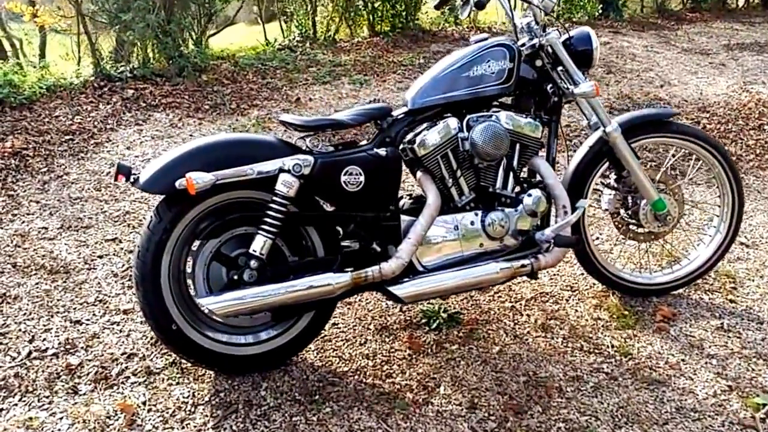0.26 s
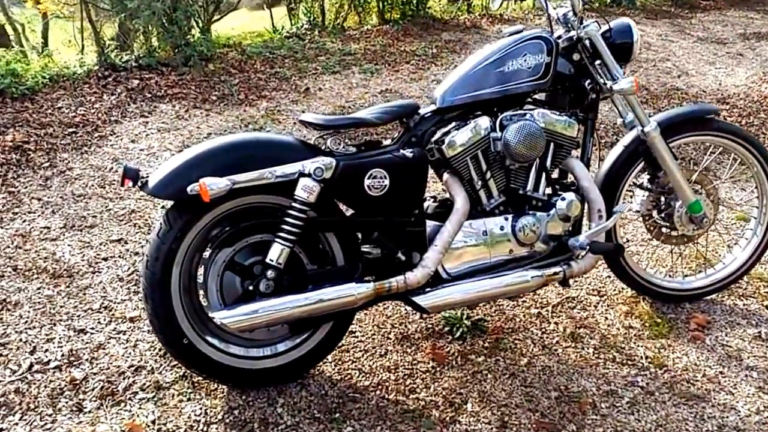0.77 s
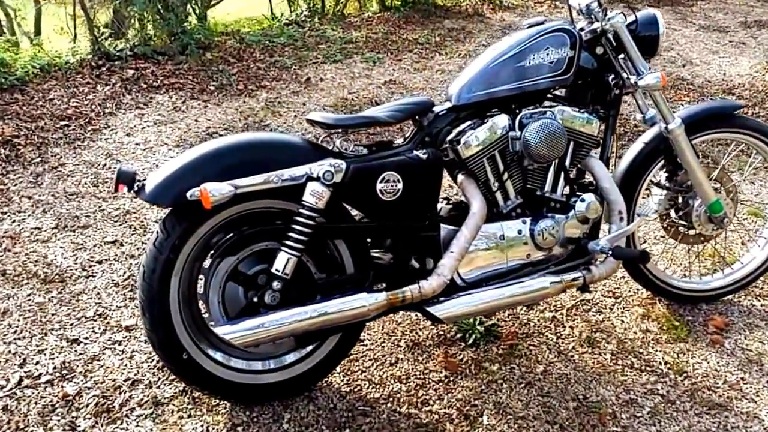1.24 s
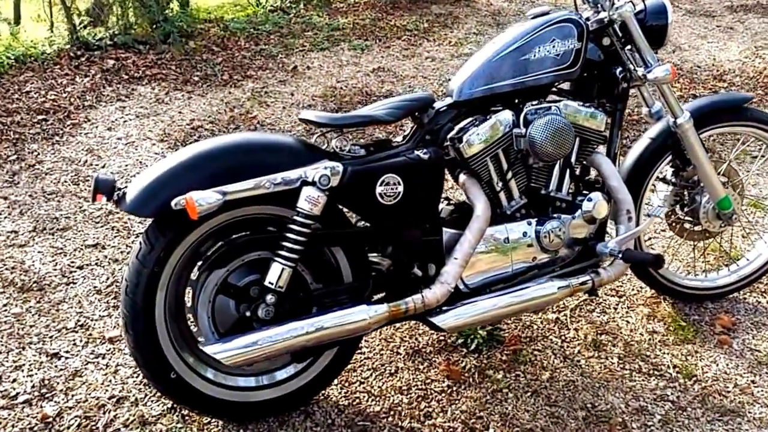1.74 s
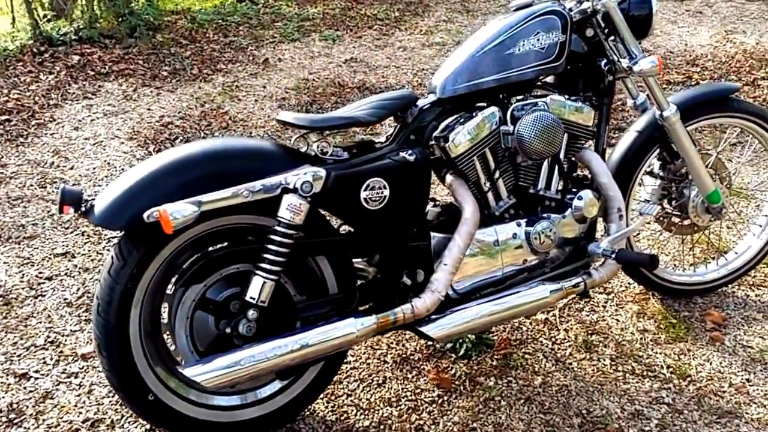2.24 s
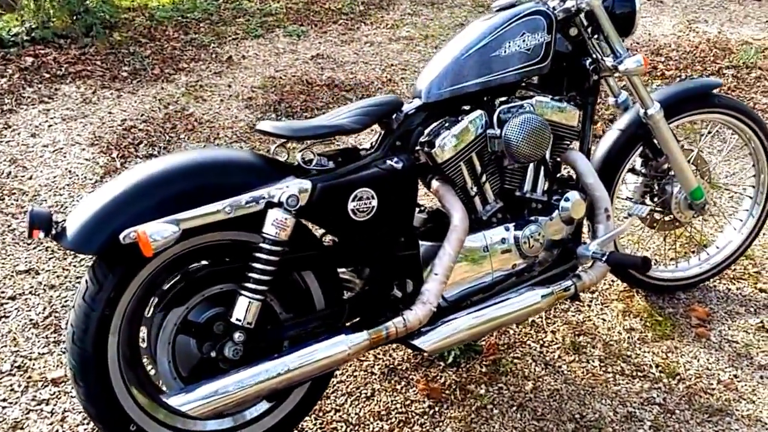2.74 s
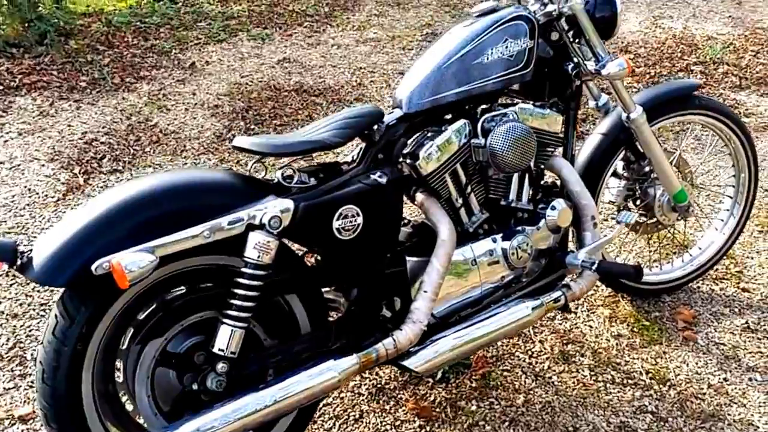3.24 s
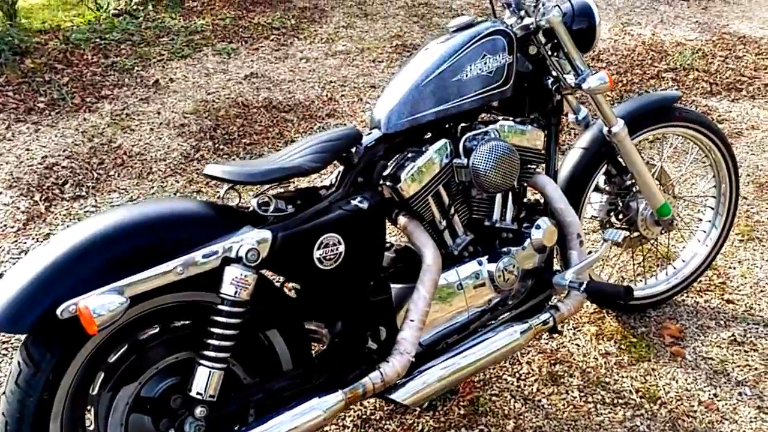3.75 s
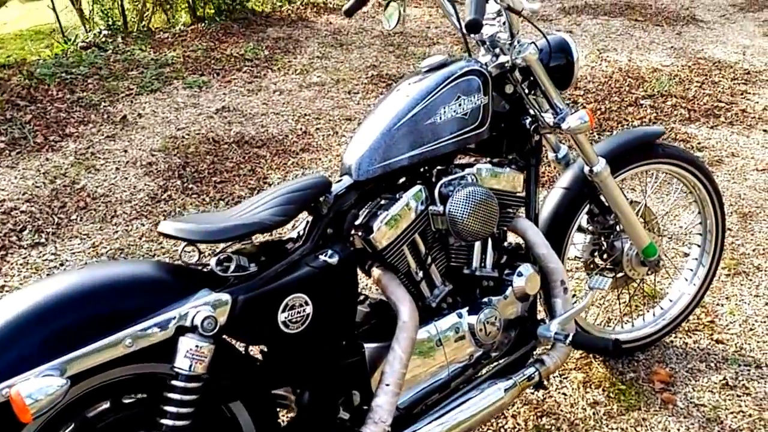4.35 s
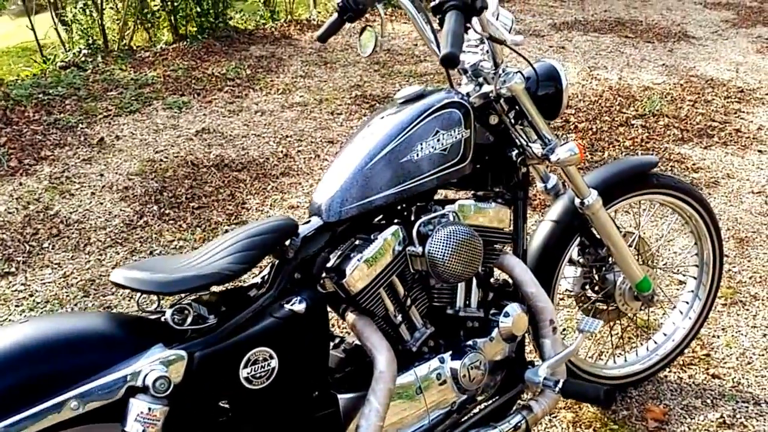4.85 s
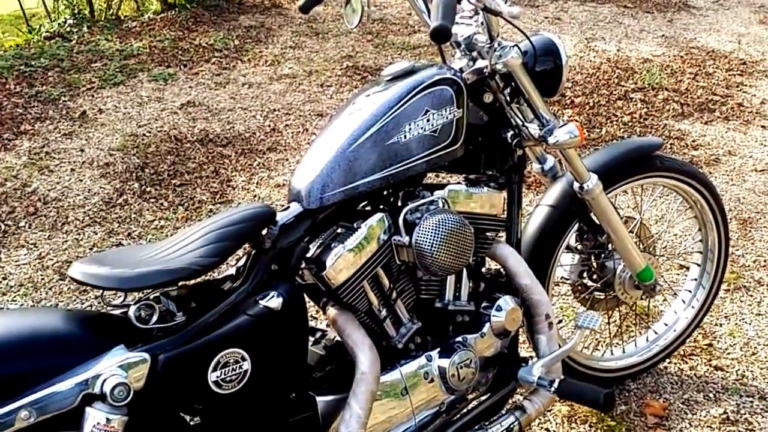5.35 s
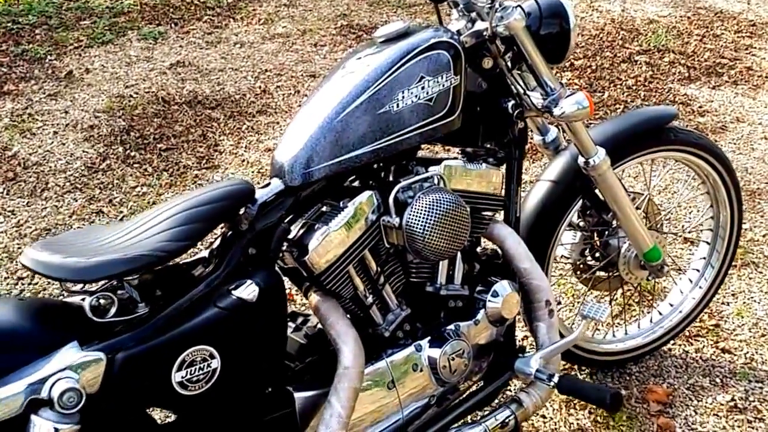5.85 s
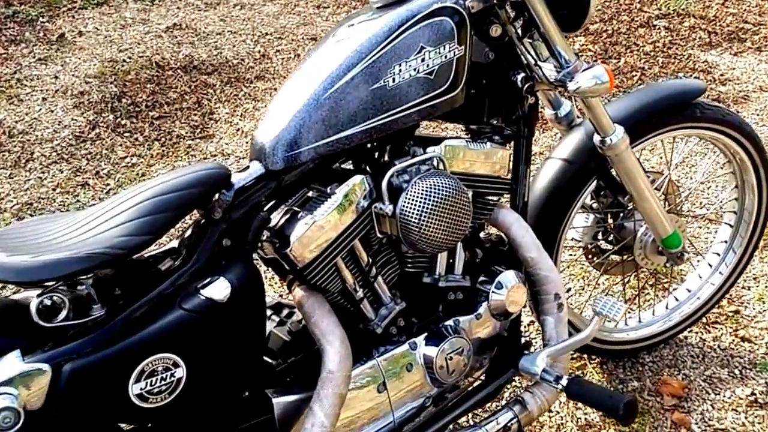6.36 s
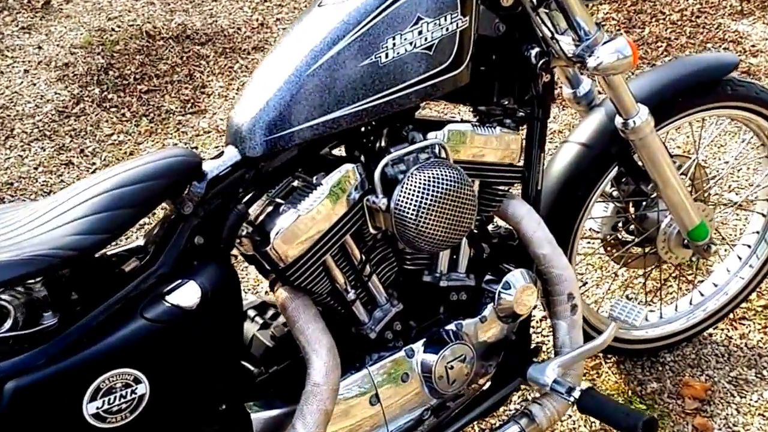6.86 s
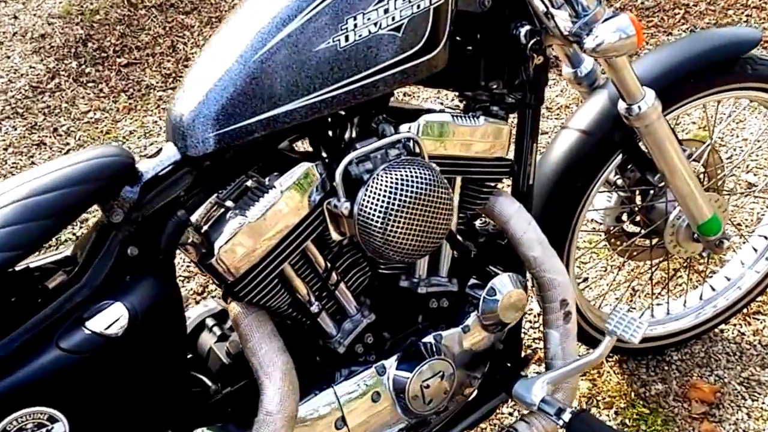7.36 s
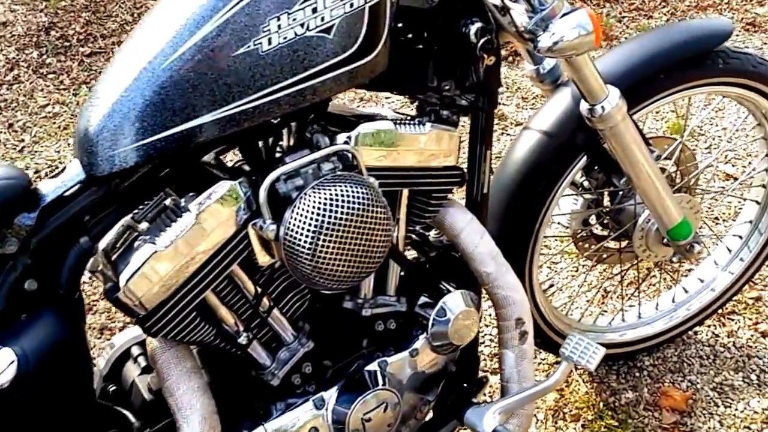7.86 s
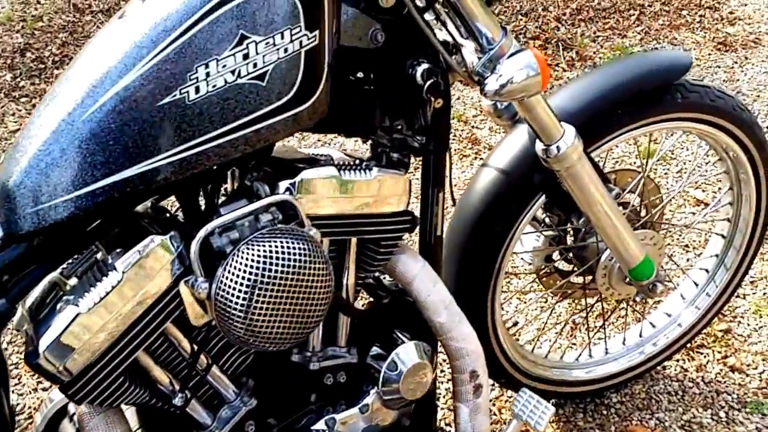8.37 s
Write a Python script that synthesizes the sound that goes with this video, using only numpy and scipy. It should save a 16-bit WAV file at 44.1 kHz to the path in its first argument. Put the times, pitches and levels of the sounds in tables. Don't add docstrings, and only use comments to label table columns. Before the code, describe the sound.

A large twin-cylinder motorcycle idles unevenly in an open gravel yard. Deep exhaust thumps come in irregular singles and close pairs, each with a short spit of hissing gas. Intake gulps and valve ticks fall between them. Over about eight seconds the handheld stereo microphone moves closer; tappet and gear clatter grows until it crowds the exhaust, and strong thumps distort, especially on the right.

```python
import sys
import numpy as np
from scipy import signal
from scipy.fft import rfft, irfft, next_fast_len
from scipy.io import wavfile
from scipy.ndimage import uniform_filter1d, map_coordinates

SR = 44100
rng = np.random.default_rng(int(sys.argv[2]) if len(sys.argv) > 2 else 0)


def to_wav(s):
    ch = np.atleast_2d(s).T
    pcm = np.round(np.clip(ch, -1, 1) * 32767)
    wavfile.write(sys.argv[1], SR, pcm.astype(np.int16))


def makeup_ratio(level_db):
    decades = np.asarray(level_db, float) / 20
    return 10 ** decades


N = 379701
CYCLE_S = .157
AGE = np.arange(SR // 3) / SR

# (frequency [Hz], level [dB per Hz])
GAS_BREATH = [(250, 16), (400, 6.5), (700, 10), (1000, 3.5), (1400, -4.5), (2700, -2.5), (4500, -10),
              (9000, -12), (14000, -34.5)]
# (frequency [Hz], level [dB per Hz])
FAR_WHIRR = [(2500, -41), (4000, -21), (5200, -24), (6700, -4), (8500, -3), (11000, -5.5), (14300, -13.5)]
NEAR_WHIRR = [(2500, -31), (4000, -51), (5000, 4), (5700, 6.5), (6600, -9), (7700, 14), (8600, 0.5),
              (10200, 6), (12500, 1), (14300, 3)]


def unit(x):
    return x / np.sqrt(np.mean(x ** 2) + 1e-20)


def along(points, hz):
    f, v = np.transpose(points)
    return np.interp(np.log(hz + 1), np.log(f + 1), v)


def wobble(rate):
    return map_coordinates(rng.standard_normal(int(N * rate / SR) + 4), [np.arange(N) * rate / SR])


def filtered(x, response):
    m = next_fast_len(N + SR // 2)
    return irfft(rfft(x, m) * response(np.fft.rfftfreq(m, 1 / SR)), m)[..., :N]


def colour(spectrum):
    return lambda hz: makeup_ratio(along(spectrum, hz))


def peak(centre_hz, width_hz):
    return lambda hz: 1 / (1 + (2 * (hz - centre_hz) / width_hz) ** 2)


def rush(gain, patchy_db=0):
    # (frequency [Hz], likeness [-1 to 1])
    alike = [(100, .98), (300, .9), (640, .8), (1300, .7), (1800, .2), (2250, -.85), (2900, -.3),
             (4200, .1), (4800, -.2), (5300, -.8), (5900, -.1), (7000, 0)]
    z = signal.stft(rng.standard_normal((2, N)), nperseg=256)[2]
    field = uniform_filter1d(rng.standard_normal(z.shape[1:]), size=3, axis=0)
    field = uniform_filter1d(field, size=7, axis=1)
    pair = signal.istft(z * makeup_ratio(patchy_db * unit(field)), nperseg=256)[1][:, :N]

    def mid_side_gain(hz):
        angle = np.arccos(np.clip(along(alike, hz), -1, 1)) / 2
        return gain(hz) * np.array([np.cos(angle), np.sin(angle)])

    mid, side = filtered(pair, mid_side_gain)
    return np.array([mid + side, mid - side]) / np.std(mid - side)


def played(times, gains, shape):
    lead = SR // 10
    train = np.bincount(np.round(times * SR).astype(int) + lead, gains, N + SR)
    return signal.fftconvolve(train, shape)[lead:lead + N]


def puff(delay_s, rise_s):
    u = np.maximum(AGE - delay_s, 0) / rise_s
    return u * np.exp(1 - u)


def ring(modes, push):
    free = sum(swing * makeup_ratio(-60 * AGE / t60) * np.cos(2 * np.pi * hz * AGE) for hz, t60, swing in modes)
    return signal.fftconvolve(free, push / push.sum())[:len(AGE)]


def strokes():
    # (time [s], thump [dB], jet hiss [dB])
    front_leads = [(0.292, -6, -17.5), (0.7481, -5, -20.5), (1.235, -2.5, -15), (1.7074, -1, -12),
                   (2.178, -6.5, -33), (2.6397, 1.1, -12), (3.0847, 0, -20), (3.5538, -1.5, -13.5),
                   (4.0148, -5, -18.5), (4.4952, 2, -10.5), (4.962, -3.5, -23), (5.4519, 1.5, -9),
                   (5.9185, 0, -15), (6.3859, 0, -13.5), (6.848, 1.7, -16.5), (7.474, -7, -42),
                   (7.9837, 3.5, -18.5), (8.437, 0.5, -33)]
    # (time [s], thump [dB], jet hiss [dB])
    front_alone = [(-0.0085, -5, -37), (0.5933, -3.5, -11.5), (0.902, -2, -13), (1.065, -3.5, -15.5),
                   (1.3849, 0, -16.5), (1.54, -2.4, -16.5), (2.0235, -0.5, -12), (2.327, 2.5, -13.5),
                   (2.9297, 0.8, -11), (3.2301, -0.5, -18.5), (3.3856, -2.5, -20), (3.8568, -1, -17),
                   (4.1666, 1.5, -13.5), (4.8099, -0.5, -13.5), (5.112, 1.5, -14), (5.6036, -4.5, -30),
                   (5.7614, 1.5, -9.5), (6.0617, 2.5, -12.5), (6.5312, -2, -24), (6.6891, 2, -15),
                   (6.9977, 3.5, -13), (7.3197, 3, -14), (7.645, 3, -15.5), (8.284, 3, -21),
                   (8.597, 2.5, -21)]
    # (time [s], thump [dB], jet hiss [dB])
    rear_fires = [(0.0405, -11.5, -27.5), (0.3558, -1, -10.5), (0.8155, -0.5, -9.5), (1.3043, 0.2, -9),
                  (1.7752, 1, -7.5), (2.2492, 1.5, -13), (2.7021, 2.5, -10), (3.151, 0.5, -7.5),
                  (3.621, 3, -10), (4.0875, 0.5, -13), (4.5589, -0.8, -15), (5.0311, 2.5, -13),
                  (5.514, 3.5, -20.5), (5.9855, 3.5, -13.5), (6.4533, 6.5, -15.5), (6.918, 4.5, -15.5),
                  (7.227, -1, -33), (7.551, 1.2, -20.5), (8.0485, 5, -20.5), (8.5084, 2.5, -23.5)]
    lit_jet_db = -26
    rear_after = .44
    drag_per_s = .806
    miss_bark_db = -44.5

    listed = [(*row, False) for row in front_leads + front_alone] + [(*row, True) for row in rear_fires]
    listed.sort()
    (s, thump, jet, rear), rear_lit = listed[0], False
    rows = [(s, rear, 0, thump, miss_bark_db, jet)]
    for (s0, *_, rear0), (s1, thump1, jet1, rear1) in zip(listed, listed[1:]):
        span_s = s1 - s0
        offset = rear_after * (rear1 - rear0)
        whole = round(span_s / CYCLE_S - offset)
        for k in range(1, 2 * whole + rear1 - rear0):
            rear = bool((k + rear0) % 2)
            turned = (k + rear0) // 2 + rear_after * (rear - rear0)
            age = span_s * turned / (whole + offset)
            s = s0 + age - drag_per_s * age * (span_s - age) / 2
            if rear and rear_lit:
                early_s, base_db, bark, jet = .00402, -6.5, -21, -25
            else:
                early_s, base_db, bark, jet = .01, -12, miss_bark_db, -35.5
            thump = base_db + .38 * thump + .6046 * s - 15.5 * age
            rows.append((s, rear, early_s, thump, bark, jet - .5 * s))
            rear_lit = rear_lit and not rear
        thump = thump1
        if rear1:
            rear_lit = jet1 > lit_jet_db
        bark = 15.5 + 1.452 * jet1 + .28 * s1
        rows.append((s1, rear1, 0, thump1, bark, jet1))
    return np.transpose(rows)


def pipe(modes):
    lift = ring([(hz, t60, a) for hz, t60, a, b in modes], puff(0, .0013))
    return lift + ring([(hz, t60, b) for hz, t60, a, b in modes], puff(.0116, .001))


def exhaust(fired):
    # (frequency [Hz], t60 [s], swing at valve lift, swing at blowdown)
    thump_modes = [(46.6, .054, .5, .39), (69, .063, -1.02, -.97), (95, .36, .43, 0)]
    bark_modes = [(209, .1, .375, -.23), (304, .1, -.03, .035)]
    # (frequency [Hz], t60 [s], swing)
    mouth_modes = [(620, .022, -.09), (780, .018, -.17), (960, .018, -.08)]
    # (frequency [Hz], level [dB per Hz])
    jet_spectrum = [(300, -101), (700, 7.5), (1200, -4.5), (2200, -1.5), (3200, -4), (5000, -2.5),
                    (8000, 4.5), (11000, 3), (14000, -4)]
    crank_s, rear, early_s, thump_db, bark_db, jet_db = fired
    s = crank_s - early_s
    tone = played(s, makeup_ratio(thump_db), pipe(thump_modes)) + played(s, makeup_ratio(bark_db), pipe(bark_modes))

    facing = puff(.0011, .0045) ** 3 + .066 * puff(.014, .00054) + .005 * puff(.0085, .072)
    shaded = .8 * puff(.0028, .0022) ** 3 + .41 * puff(.0075, .0021) + .013 * puff(.0033, .0033)
    spit = np.array([played(crank_s, makeup_ratio(jet_db), shape) for shape in (shaded, facing)])
    jet = spit * makeup_ratio(2.4 * wobble(600)) * rush(colour(jet_spectrum), patchy_db=3.2)

    breath = puff(.00051, .0044) + .33 * puff(.016, .016)
    rasp = played(s, makeup_ratio(1.27 * thump_db - 21), breath) * rush(colour(GAS_BREATH), patchy_db=4.5)

    knock = 0
    for mode in mouth_modes:
        rap = ring([mode], puff(0, .0001)) + .7 * ring([mode], puff(.0066, .0001))
        luck_db = rng.normal(0, 3, len(s))
        knock = knock + played(s, makeup_ratio(.6 * bark_db - 1 + luck_db), rap)

    sigh_level = played(s, makeup_ratio(.72 * thump_db - 50.5), puff(.006, .026))
    sigh = sigh_level * rush(colour(FAR_WHIRR), patchy_db=1)
    return tone, jet + rasp + knock + sigh


def yard(x):
    # (frequency [Hz], t60 [s])
    decay = [(100, 0.34), (1000, 0.12), (10000, 0.009)]
    hz, t, z = signal.stft(rng.standard_normal((2, SR // 4)), SR, nperseg=256)
    tail = signal.istft(z * makeup_ratio(-60 * t / along(decay, hz)[:, None]), SR, nperseg=256)[1]
    return signal.fftconvolve(x, tail / np.linalg.norm(tail[0]), axes=1)[:, :N]


def gulps(fired):
    s, rear, early_s, thump_db, *_ = fired
    gap = np.diff(s, prepend=s[0] - CYCLE_S / 2)
    hurry_ms = 1000 * (CYCLE_S - gap - np.roll(gap, 1))
    gulp_db = 7.5 + .36 * thump_db - .0265 * hurry_ms - rear - .33 * (s - 3.8) ** 2
    tick_db = -42 + 1.4 * s + .06 * hurry_ms * (1 - rear) + .69 * s * rear
    tick_db += 2 * rng.standard_normal(len(s))
    opens = s + .024 + .28 * gap + .0041 * rear * (early_s > 0)
    return opens, gulp_db, tick_db


def intake(fired):
    # (frequency [Hz], t60 [s], swing)
    tract_modes = [(73.2, 0.092, -0.08), (104.7, 0.17, 0.12), (218, 0.14, -0.072)]
    s, gulp_db, tick_db = gulps(fired)
    tone = played(s, makeup_ratio(gulp_db), ring(tract_modes, puff(0, .00062)))
    suck = played(s, makeup_ratio(gulp_db - 39), puff(0, .0074)) * rush(colour(GAS_BREATH), patchy_db=-3.5)
    seat = puff(.0073, .0014) + .23 * puff(.027, .0057)
    tick = played(s, makeup_ratio(tick_db), seat) * rush(colour(NEAR_WHIRR), patchy_db=4.5)
    ping_db = -34.5 - 3.4 * abs(s - 5.6) + 2 * rng.standard_normal(len(s))
    ping = played(s, makeup_ratio(ping_db), puff(.014, .0044)) * rush(peak(2700, 130))
    return tone, tick + suck + ping * makeup_ratio([[-6], [0]])


def machinery(fired, near_db):
    # (frequency [Hz], level [dB per Hz])
    far_case = [(200, -34), (300, -32), (450, -12.5), (700, -0.5), (1000, -4.5), (1300, -9), (2000, -17.5),
                (2700, -12), (3400, -20.5), (4500, -24), (6000, -20)]
    near_case = [(200, -36), (300, 5.5), (450, 13), (700, 11), (1000, -33), (1300, 2), (2000, 2),
                 (2700, 4.5), (3400, -3.5), (4500, -3), (6000, -11)]
    # (frequency [Hz], width [Hz], right [dB], left [dB], start [s], end [s])
    whines = [
        (1815, 80, -17, -9, 1.4, 5.7),
        (1975, 110, -19, -11, 5.7, 9),
        (1000, 90, -10, -13, 4, 9),
        (1550, 140, -16, -14, 5.6, 9),
        (5700, 350, -13, -15, 7.3, 9.5),
        (8700, 900, -10, -10, 6.8, 9.5),
    ]
    t = np.arange(N) / SR
    near = np.interp(t, (2.47, 12.1), (0, 1))

    def blend(far, close):
        far_noise = rush(colour(far), patchy_db=3.5)
        return np.sqrt(1 - near) * far_noise + np.sqrt(near) * rush(colour(close), patchy_db=5)

    when, luck = rng.random((2, 600))
    rattle = 1 + played(when * N / SR, -.6 * np.log(luck), puff(0, .0022))
    case = blend(far_case, near_case) * rattle * makeup_ratio(1.5 * wobble(25))

    s, rear, early_s, thump_db, *_ = fired
    load = unit(played(s, makeup_ratio(thump_db), puff(0, .032))) - 1
    case *= makeup_ratio(3 * (1 - .7 * near) * load)

    for hz, width_hz, right_db, left_db, start, end in whines:
        heard = np.clip(np.minimum(t - start, end - t) / .51, 0, 1)
        sway = makeup_ratio(3 * wobble(22))
        case += makeup_ratio([[left_db], [right_db]]) * heard * sway * rush(peak(hz, width_hz))
    whirr = blend(FAR_WHIRR, NEAR_WHIRR) * rattle * makeup_ratio(1.2 * wobble(30))
    return makeup_ratio(-38.5 + .45 * near_db) * case + makeup_ratio(-49 + 1.33 * near_db) * whirr


def rumble():
    # (frequency [Hz], level [dB per Hz])
    rumble_spectrum = [(18, -48), (30, 3), (63, 7.5), (91, 7.5), (201, -6), (249, -54), (306, -11.5),
                       (350, -15), (460, -76), (770, -120)]
    return makeup_ratio(-25.5 + 2 * wobble(15)) * rush(colour(rumble_spectrum))


def scene():
    # (time [s], nearness [dB], left-right [dB])
    walk = [
        (0.0, -4.5, -8.5),
        (0.4, -1.5, -9),
        (2.04, 0.5, -7.5),
        (4.89, -0.5, -6.5),
        (6.09, 3, -6.5),
        (7.43, 6, -6),
        (8.61, 11, -5),
    ]
    # (frequency [Hz], level [dB])
    shade = [(300, 1), (700, -9), (1100, -2.5), (1900, 5.5), (2700, 2), (4500, 6), (6000, 3.5), (8000, -19),
             (14000, -14.5)]
    walk_s, *levels = np.transpose(walk)
    near_db, pan_db = [np.interp(np.arange(N) / SR, walk_s, level) for level in levels]

    fired = strokes()
    thump, spit = exhaust(fired)
    gulp, tick = intake(fired)
    tone = thump + gulp
    noise = spit + tick + makeup_ratio(-9.5) * yard(spit) + machinery(fired, near_db) + rumble()

    late = filtered(tone, lambda hz: np.exp(-2j * np.pi * hz * .00014))
    left = makeup_ratio(-.6) * late + makeup_ratio(pan_db) * filtered(noise[0], colour(shade))
    right = makeup_ratio(.95 - pan_db) * tone + noise[1]
    return np.array([left, right])


def low_pass(x):
    return signal.sosfilt(signal.butter(12, 15490, fs=SR, output="sos"), x)


def record(dry):
    x = filtered(dry, lambda hz: (hz < 14250) * hz ** 4 / (hz ** 4 + 33 ** 4))
    bass = filtered(x, lambda hz: 1 / (1 + (hz / 900) ** 4))
    squeezed = bass / (1 + np.abs(bass / 1.95) ** 9.8) ** (1 / 27)
    mix = np.clip(x - bass + squeezed, -1, 1)
    return low_pass(mix)


dry = scene()
out = record(dry)
to_wav(out)
```